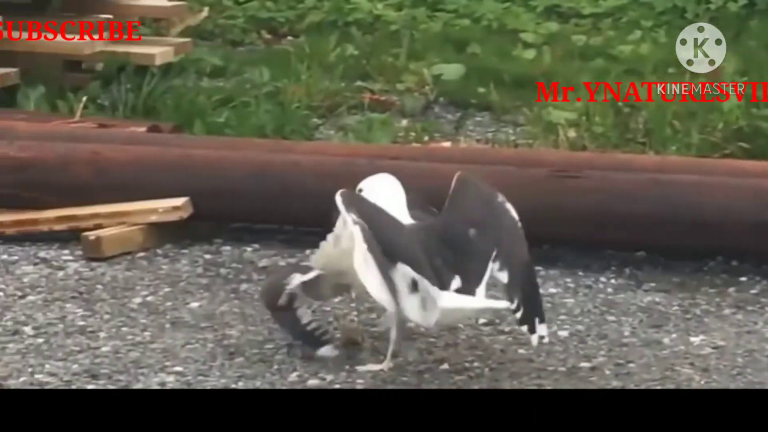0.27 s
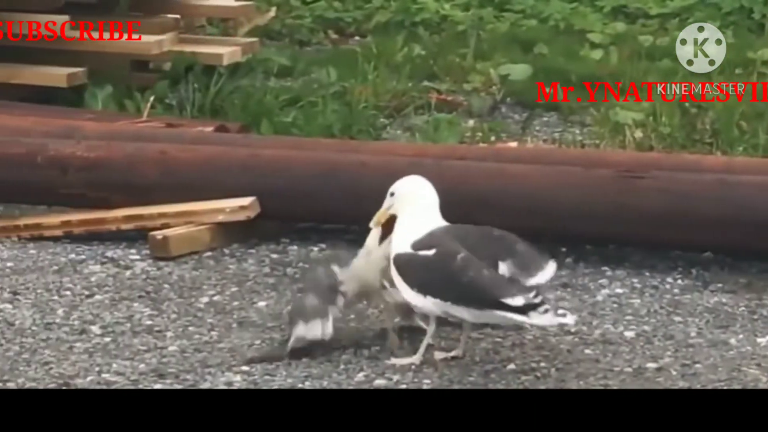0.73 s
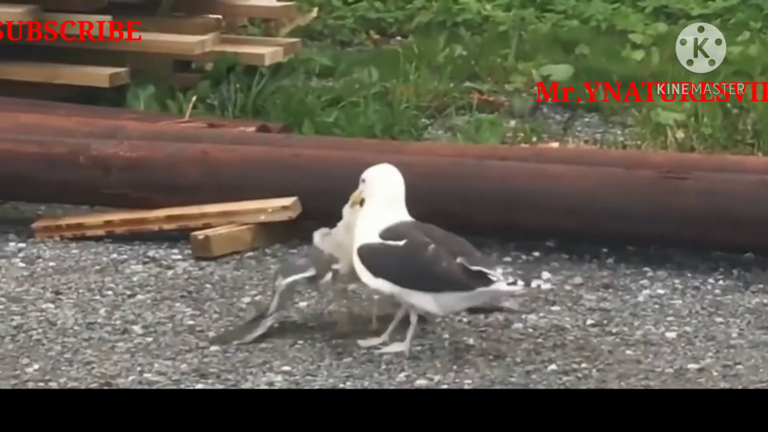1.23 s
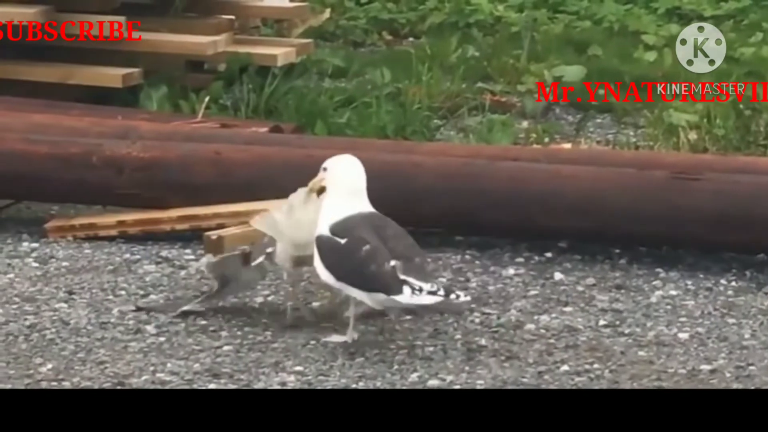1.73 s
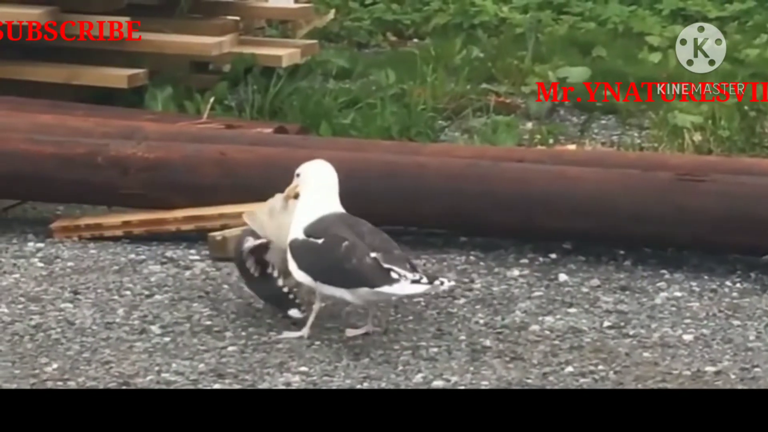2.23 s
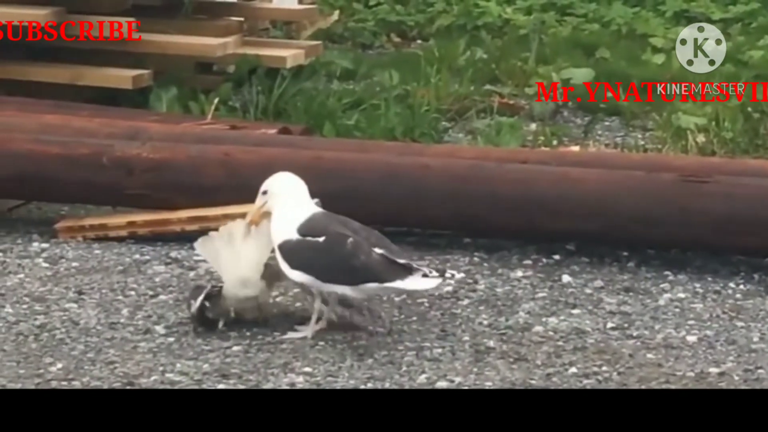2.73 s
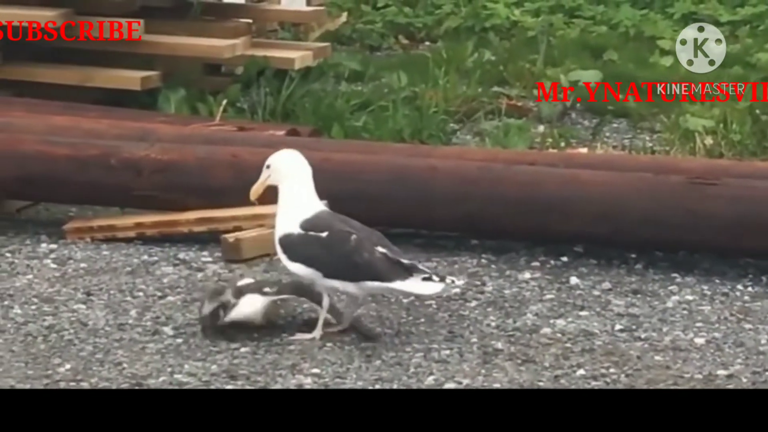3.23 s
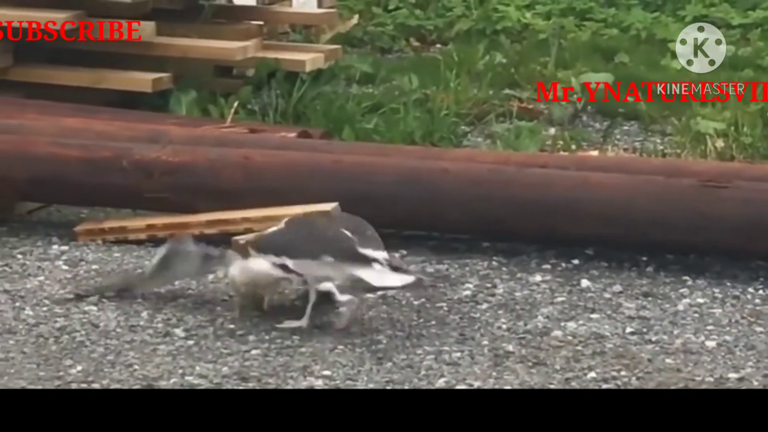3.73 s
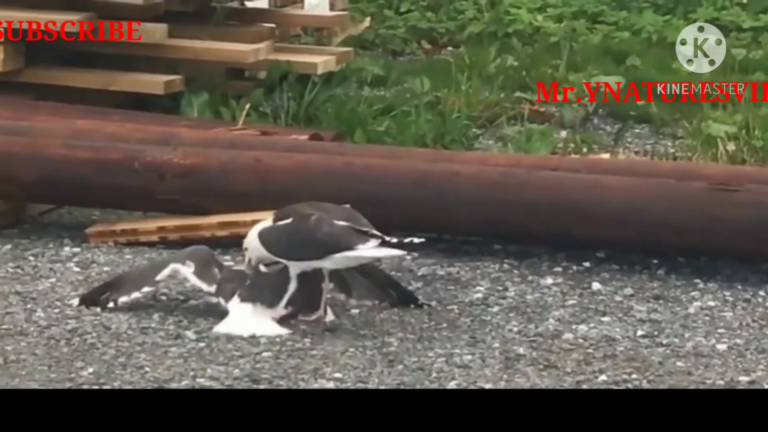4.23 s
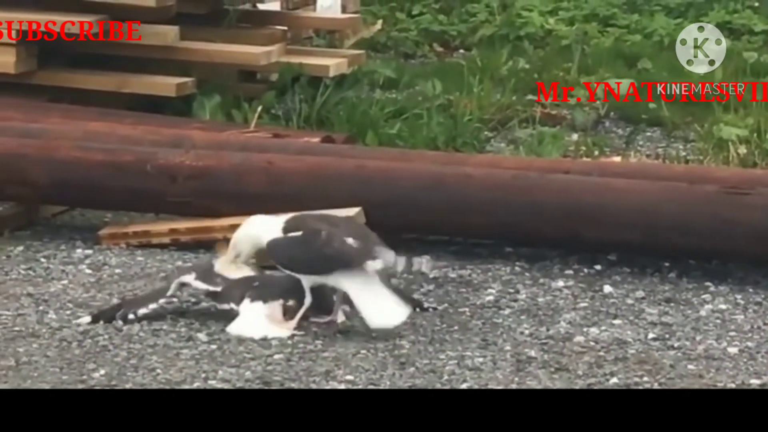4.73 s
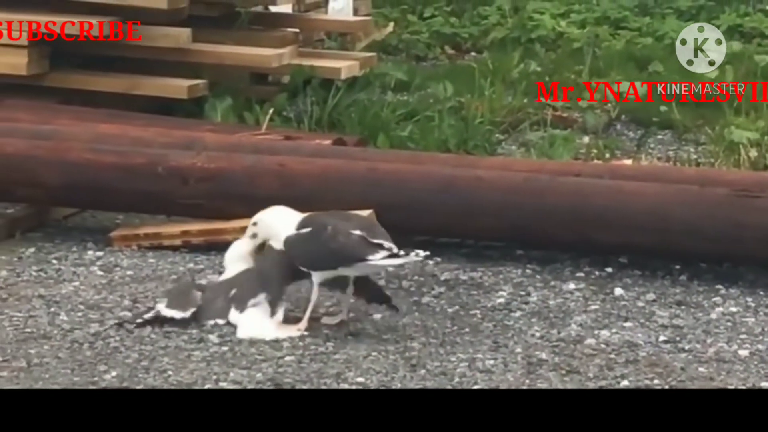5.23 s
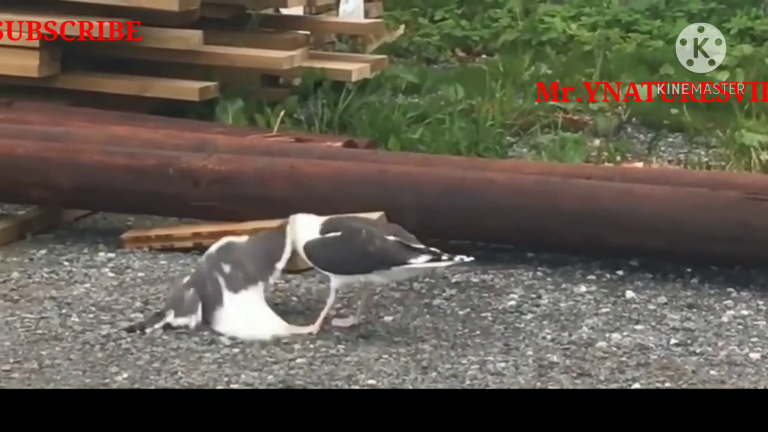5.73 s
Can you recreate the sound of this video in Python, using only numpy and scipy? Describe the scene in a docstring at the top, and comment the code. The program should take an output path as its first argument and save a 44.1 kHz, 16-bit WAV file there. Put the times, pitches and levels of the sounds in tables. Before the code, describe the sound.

Two fighting gulls: harsh, wavering cries with wing thumps, bill snaps and gravel clicks over a low drone of distant machinery.

```python
"""In an industrial yard, two large gulls fight on gravel; the one held down gives harsh, wavering cries.
Each cry is a train of pulses from the bird's voice box (the syrinx) that makes its throat ring,
and it breaks into a rasp under strain. Bills snap, stones click, feathers rustle and wings thump,
with a faint echo, over the low drone of distant machinery."""
import sys
import numpy as np
from scipy import signal
from scipy.fft import rfft, irfft, next_fast_len
from scipy.io import wavfile
from scipy.ndimage import uniform_filter1d, map_coordinates

SR = 44100
rng = np.random.default_rng(int(sys.argv[2]) if len(sys.argv) > 2 else 0)


def materialize(psi):
    """Save the field psi as 16-bit PCM at rate SR to the path in sys.argv[1].

    A 1-D psi becomes a single channel; in a 2-D psi each row is a channel.
    """
    bounded = np.clip(np.atleast_2d(psi).T, -1, 1)
    quanta = np.round(bounded * 32767).astype(np.int16)
    wavfile.write(sys.argv[1], SR, quanta)


N = 263718

# Feathers sweeping the ground. Each row: middle in seconds, half length in seconds, level in dB,
# extra dB for the part below 4 kHz.
FEATHER_STROKES = [(0.113, 0.047, -67.5, 8.5), (0.5, 0.098, -68.5, -8), (0.682, 0.042, -67.5, 8.5),
                   (0.821, 0.049, -66.5, 6.5), (0.924, 0.052, -64.5, 1), (1.397, 0.079, -61.5, 2),
                   (1.703, 0.17, -68, 3.5), (1.97, 0.092, -66, 6), (2.731, 0.094, -70.5, 6),
                   (2.937, 0.05, -77, -6), (3.686, 0.08, -77.5, -2), (3.977, 0.21, -72, 2.5),
                   (5.31, 0.025, -78, 6.5), (5.518, 0.061, -68.5, -13), (5.902, 0.1, -77, 2)]


def amp(db):
    """Turn decibels into a gain."""
    return 10 ** (np.asarray(db) / 20)


def unit(x):
    """Scale to an average (rms) size of 1."""
    return x / np.sqrt(np.mean(x ** 2) + 1e-20)


def peaked(x):
    """Scale to a peak of 1."""
    return x / np.abs(x).max()


def along(points, hz):
    """Read between (Hz, value) points, with octaves evenly spaced."""
    point_hz, values = np.transpose(points)
    return np.interp(np.log(hz + 1), np.log(point_hz + 1), values)


def curves(rows, t):
    """Read each column after the first (seconds) at times t."""
    seconds, *columns = np.transpose(rows)
    return [np.interp(t, seconds, column) for column in columns]


def wobble(rate):
    """A smooth curve through `rate` random values a second."""
    return map_coordinates(rng.standard_normal(int(N * rate / SR) + 4), [np.arange(N) * rate / SR])


def causal(db):
    """Turn gains in dB into a filter that rings only after it is struck (minimum phase)."""
    cepstrum = irfft(np.log(amp(db)))
    half = cepstrum.shape[-1] // 2
    return np.exp(rfft(cepstrum * np.r_[1, np.full(half - 1, 2), 1, np.zeros(half - 1)]))


def coloured(x, points):
    """Filter x to a tone colour given as (Hz, dB) points."""
    size = 2 * next_fast_len(len(x) // 2 + 2048)
    response = causal(along(points, np.fft.rfftfreq(size, 1 / SR)))
    return irfft(rfft(x, size) * response)[:len(x)]


def add(track, start_s, sound):
    """Mix a sound into the track."""
    part = track[round(start_s * SR):][:len(sound)]
    part += sound[:len(part)]


def hump(hz, centre_hz, width):
    """A bell-shaped curve around one frequency."""
    return np.exp(-.5 * (np.log((hz + 1) / centre_hz) / width) ** 2)


def bumps(rows):
    """Smooth swells. Each row: middle in seconds, half length in seconds, height."""
    out = np.zeros(N)
    for middle, half, height in rows:
        start = max(middle - 3 * half, 0)
        t = np.arange(start, middle + 3 * half, 1 / SR)
        add(out, start, height * np.exp(-((t - middle) / half) ** 2))
    return out


def pulses(at, sizes):
    """Clean, sharp pulses that may fall between samples."""
    taps = np.floor(at)[:, None] + np.arange(-7, 9)
    offset = taps - at[:, None]
    shapes = sizes[:, None] * np.sinc(offset) * np.cos(np.pi * offset / 16) ** 2
    return np.bincount(np.clip(taps, 0, N - 1).astype(int).ravel(), shapes.ravel(), N)


def machinery(rumble_db=-63.5, hum_gain_db=-2, waver_db=5):
    """Distant machines rumble and hum unsteadily under a faint outdoor hiss."""
    # Each row: frequency in Hz, relative level in dB.
    hum_tones = [(49.6, -67.5), (97, -72.5), (124, -71.5)]
    rumble_colour = [(12, -44.5), (20, -26), (38, -3), (70, -3), (133, -3.5), (196, -8.5), (213, -15),
                     (274, -16.5), (404, -20.5), (452, -23), (906, -24.5), (985, -22.5), (1500, -30),
                     (1770, -31), (15500, -43.5)]
    t = np.arange(N) / SR
    hum = np.zeros(N)
    for hz, db in hum_tones:
        level = amp(db + hum_gain_db + waver_db * wobble(12))
        hum += level * np.sqrt(2) * np.sin(2 * np.pi * hz * t + wobble(7))
    return hum + amp(rumble_db) * unit(coloured(rng.standard_normal(N), rumble_colour))


def syrinx(pitch, rough, sounding, jitter=0.12, tremor=0.00061, shimmer_db=3, doubling=0.13):
    """The voice box pulses once a cycle; strain scatters the pulses and lets rushing air through."""
    cycles = np.cumsum(sounding * pitch) / SR
    at = np.interp(np.arange(int(cycles[-1]) + 1) + 1e-3, cycles, np.arange(N))
    period, strain = SR / pitch[at.astype(int)], rough[at.astype(int)]
    late, size = rng.standard_normal((len(at), 2)).T
    slip = (tremor + jitter * strain ** 1.5) * period * late
    # Strain also weakens every second pulse.
    alternation = 1 + doubling * strain * np.cos(np.pi * np.arange(len(at)))
    sizes = amp(shimmer_db * strain * size) * alternation
    train = pulses(at + slip, np.sqrt(period) * sizes)
    # Air escapes in a burst as the membranes part, and its share grows toward the treble.
    burst = sounding * (1 + 1.1 * np.cos(2 * np.pi * (cycles - .15)))
    air = coloured(rng.standard_normal(N), [(1200, 0), (3500, 10), (7000, 16)])
    return train * (1 - rough ** 2) + burst * air * rough / (1 + rough ** 2)


def thrash(hz, frames, bands=9, span=7):
    """A thrashing head shifts small peaks and dips through the overtones (dB by frequency and time)."""
    ripples = uniform_filter1d(rng.standard_normal((len(hz), frames)), bands, axis=0)
    for _ in range(2):
        ripples = uniform_filter1d(ripples, span, axis=1)
    depth_db = along([(1100, .5), (2200, 2.2), (4500, 3.5)], hz)
    return unit(ripples) * depth_db[:, None]


def cry(voice, colour, throat_hz, throat_hz_per_db, half_width_hz, edge_db, gape_db, sizzle_db, tuning,
        gape_db_per_octave=12, drive_db=9, leak=0.23, waver=0.0048, chaos=.08):
    """Voice-box pulses ring the windpipe, the moving throat and three resonances of the opening bill."""
    # The voice breaks into a rasp. Each row: middle and half length in seconds, added roughness (0-1).
    breaks = [(0.155, 0.018, 0.53), (0.25, 0.049, 0.78), (0.375, 0.062, 0.39), (1.23, 0.015, 0.08),
              (1.37, 0.032, 0.15), (1.847, 0.019, 0.5), (2.506, 0.064, 0.14), (2.97, 0.034, 0.07),
              (4.195, 0.019, 0.06), (4.474, 0.023, 0.6)]
    # The voice catches. Each row: time in seconds, upward jump as a share of the pitch.
    catches = [(2.921, 0.17), (2.987, 0.17), (3.135, 0.1304), (3.29, 0.32)]
    # The windpipe's 600 Hz ring changes as the neck is wrung. Each row: time in seconds, boost in dB.
    windpipe_boosts = [(0.04, -0.5), (0.24, 17.5), (0.45, -11), (0.56, -1.5), (1.205, -20), (1.238, 13.5),
                       (1.268, -23), (1.39, 8.5), (1.465, 11), (1.51, -6), (1.68, -7), (1.97, 3.5),
                       (2.83, 4), (2.9, -10), (3.2, -5), (4.1, 3.5)]
    pitch, level, brightness, rough = voice
    rough = np.clip(rough + bumps(breaks), .01, .95)
    catch = bumps([(s, .0025, jump) for s, jump in catches])
    # Under strain the membranes lose their steady pitch.
    unsteady = pitch * (1 + catch + waver * wobble(70) + chaos * rough ** 2 * wobble(160))
    sounding = level > 1e-5
    first, last = np.flatnonzero(sounding)[[0, -1]]
    source = amp(drive_db) * level * syrinx(unsteady, rough, sounding)
    # The airway keeps changing shape, so each short slice of sound gets its own filter.
    hz, slice_s, slices = signal.stft(source[first:last + 1024], SR, nperseg=1024, noverlap=768)
    now = np.minimum(first + (slice_s * SR).astype(int), last)[:, None]
    effort_db = np.clip(20 * np.log10(level[now] / level[sounding].mean() + 1e-9), -8, 8)
    # Effort shifts the throat's ring, and the bird tunes it part of the way to the nearest overtone.
    rest_hz = throat_hz + throat_hz_per_db * effort_db
    centre_hz = rest_hz - tuning * pitch[now] / np.pi * np.sin(2 * np.pi * rest_hz / pitch[now])
    # Membranes that no longer close damp the throat and widen its resonance.
    width_hz = half_width_hz * (1 + leak * rough[now])
    throat = -10 * np.log10(1 + ((hz - centre_hz) / width_hz) ** 2) * hump(hz, 1173, 0.89)
    # The bill opens as a whole: its low boost (gape) and high one (sizzle) follow the middle one (edge).
    edge = brightness[now] + edge_db
    gape = gape_db + 0.18 * edge + gape_db_per_octave * np.log2(pitch[now] / pitch[sounding].mean())
    sizzle = sizzle_db + 0.78 * edge
    bill = gape * hump(hz, 2080, 0.15) + edge * hump(hz, 3410, 0.15) + sizzle * hump(hz, 7300, 0.63)
    windpipe = curves(windpipe_boosts, now / SR)[0] * hump(hz, 600, 0.12)
    filter_db = along(colour, hz) + windpipe + throat + bill + thrash(hz, len(slice_s)).T
    voiced = slices * causal(filter_db).T
    # The filter sets the colour; the loudness follows the effort alone.
    voiced *= np.linalg.norm(slices[hz < 2300], axis=0) / (np.linalg.norm(voiced, axis=0) + 1e-12)
    out = np.zeros(N)
    add(out, first / SR, signal.istft(voiced, SR, nperseg=1024, noverlap=768)[1])
    return out


def long_voice(rows, rough, onset_db, ending_db, scoop=1, scoop_s=0.025, sag_s=0.046, attack_s=0.0014,
               slack_hz=237.6, slack_dull_db=9.5, slack_rough=0.45, slack_span_hz=15.3):
    """A long cry scoops up from a slack, hoarse voice, holds, then sags back ever faster."""
    t = np.arange(N) / SR
    pitch, level_db, brightness = curves(rows, t)
    start, end = rows[0][0] - scoop_s, rows[-1][0] + sag_s
    opening = np.clip(1 - (t - start) / scoop_s, 0, 1)
    closing = np.clip(1 - (end - t) / sag_s, 0, 1) ** 1.39
    pitch = pitch + (slack_hz - pitch) * (scoop * opening + closing)
    swell = (t >= start) * (t <= end) * (1 - .5 * np.exp(-np.abs(t - start) / attack_s))
    hoarse = slack_rough * np.exp(-np.maximum(pitch - slack_hz, 0) / slack_span_hz)
    level = swell * amp(level_db + onset_db * opening + ending_db * closing)
    return pitch, level, brightness - slack_dull_db * (opening + closing), rough + hoarse


def cluck_voice(pitch_hz=236.8, brightness_db=-24, rough=0.31, attack_s=0.002, release_s=0.005):
    """Short clucks in a slack voice: each rises quickly, holds and fades."""
    # Each row: start in seconds, length in seconds, level in dB.
    clucks = [(3.782, 0.0064, -49), (3.801, 0.014, -41.5), (3.832, 0.021, -45.5), (3.888, 0.0092, -54),
              (4.921, 0.0041, -61)]
    t, steady = np.arange(N) / SR, np.ones(N)
    level = np.zeros(N)
    for start, length, db in clucks:
        rise = np.minimum(t - start, 0) / attack_s
        fall = np.maximum(t - start - length, 0) / release_s
        level += amp(db) * np.exp(rise - fall)
    return pitch_hz * steady, level, brightness_db * steady, rough * steady


def gull():
    """Open-billed cries, a moan and clucks with the bill half closed, and a squeal with the neck pinned."""
    # The held part of each cry. Each row: time in seconds, pitch in Hz, level in dB, brightness in dB.
    rasp_path = [(0.059, 297.2, -44, -10), (0.149, 287.9, -50, -18.5), (0.187, 336.2, -49.5, -11.5),
                 (0.237, 390.6, -50, -19.5), (0.301, 336.5, -48.5, -14.5), (0.317, 357.2, -47.5, -14.5),
                 (0.425, 354, -44, -15), (0.453, 340, -44.5, -14.5), (0.509, 351.9, -44.5, -11.5),
                 (0.545, 305, -45, -22.5), (0.635, 330.2, -40.5, -28), (0.646, 311, -42.5, -35)]
    wail_path = [(1.168, 284.5, -41, -16.5), (1.204, 271.4, -46, -15), (1.25, 347, -42.5, -18),
                 (1.288, 375.6, -38.5, -18), (1.352, 340.5, -44, -16.5), (1.39, 314.1, -44, -19.5),
                 (1.44, 354, -43, -13.5), (1.488, 312.8, -48.5, -7.5), (1.566, 341.7, -43.5, -4.5),
                 (1.588, 337.9, -43.5, -5), (1.634, 315.5, -44, -18.5), (1.672, 362.5, -39, -19),
                 (1.696, 396.3, -35, -24), (1.744, 376, -38.5, -10), (1.796, 361, -41, -19),
                 (1.812, 328, -41, -19)]
    yelp_path = [(1.905, 240.2, -47, -24.5), (1.95, 293.5, -44, -12), (1.985, 289.2, -40.5, -16)]
    moan_path = [(2.506, 304.3, -41, -16.5), (2.598, 268.9, -46, -22), (2.618, 255.1, -48, -27),
                 (2.702, 266.4, -43, -30), (2.738, 292.4, -48.5, -27), (2.776, 262.5, -43, -30),
                 (2.842, 275.6, -48.5, -18.5), (2.886, 287.1, -44, -27.5), (2.924, 283.8, -43.5, -25),
                 (3.1, 291.2, -43, -21), (3.254, 284, -41.5, -25.5)]
    squeal_path = [(4.125, 559, -47.5, -38), (4.198, 585, -44, -39), (4.21, 415.6, -49, -27),
                   (4.285, 437.7, -45, -27), (4.312, 425.5, -44.5, -25.5), (4.325, 404.3, -50, -21.5),
                   (4.402, 400.8, -50.5, -22), (4.422, 435.8, -44, -24), (4.45, 372.7, -44.5, -33.5)]
    # Tone colours of the cries as heard close to the ground, with dips from its reflection.
    # Each row: frequency in Hz, gain in dB.
    open_colour = [(150, -49.5), (300, -11.5), (470, -9), (620, 3.5), (1000, 2), (1400, -3), (1720, 5),
                   (1960, 3.5), (2250, -18), (2600, -20), (3450, -4), (4200, -14.5), (4800, -28.5),
                   (6800, -31.5), (9000, -51), (14000, -60.5)]
    moan_colour = [(150, -42), (300, -10), (560, 2), (850, 3.5), (1200, 4.5), (1450, 0.5), (1800, 4),
                   (2350, -6), (2600, -28.5), (2900, -6.5), (3400, -15.5), (3780, -14), (4900, -36),
                   (6800, -29), (8500, -50.5), (14000, -56)]
    squeal_colour = [(150, -58), (300, -30), (560, -16.5), (850, -19), (1300, -20), (1900, -30),
                     (2450, -18.5), (2850, -59), (3500, -30.5), (3950, -52), (4500, -45.5), (5300, -59),
                     (6500, -52), (9000, -70.5), (14000, -91)]
    rasp = cry(long_voice(rasp_path, rough=0.148, onset_db=-5, ending_db=-1), open_colour,
               throat_hz=1064, throat_hz_per_db=-7, half_width_hz=106, tuning=0.2,
               edge_db=17.5, gape_db=-2.5, sizzle_db=-9.5)
    wail = cry(long_voice(wail_path, rough=0.087, onset_db=-3.5, ending_db=-3), open_colour,
               throat_hz=1137, throat_hz_per_db=28.5, half_width_hz=67, tuning=0.22,
               edge_db=17.5, gape_db=1.5, gape_db_per_octave=32, sizzle_db=-6)
    yelp = cry(long_voice(yelp_path, rough=0.082, onset_db=-5, ending_db=-11), open_colour,
               throat_hz=1137, throat_hz_per_db=-5, half_width_hz=53, tuning=0.27,
               edge_db=19.5, gape_db=0.5, gape_db_per_octave=-27, sizzle_db=-4.5)
    moan = cry(long_voice(moan_path, rough=0.036, onset_db=-2.5, ending_db=-4), moan_colour,
               throat_hz=1090, throat_hz_per_db=29, half_width_hz=98, tuning=0.28,
               edge_db=23.5, gape_db=-1.5, gape_db_per_octave=16, sizzle_db=-3.5)
    clucks = cry(cluck_voice(), moan_colour,
                 throat_hz=1180, throat_hz_per_db=3, half_width_hz=46, tuning=0.3,
                 edge_db=18, gape_db=6.5, sizzle_db=-7)
    squeal = cry(long_voice(squeal_path, rough=0.14, onset_db=-10, ending_db=-12.5, scoop=0),
                 squeal_colour, throat_hz=1128, throat_hz_per_db=44, half_width_hz=77, tuning=0.17,
                 edge_db=27.5, gape_db=-3.5, gape_db_per_octave=-13, sizzle_db=-3)
    return rasp + wail + yelp + moan + clucks + squeal


def pebbles(count=32, over_stroke_db=10, scatter_db=3, spread=0.98, knock_db=-7, treble_db=2):
    """Small stones flicked at random during the feather strokes, as rows for clicks()."""
    middle, half, stroke_db, _ = np.transpose(FEATHER_STROKES)[:, np.arange(count) % len(FEATHER_STROKES)]
    when, size = rng.uniform(-1, 1, (count, 2)).T
    times = np.clip(middle + spread * half * when, 0, N / SR)
    levels = stroke_db + over_stroke_db + scatter_db * size
    return [(start, db, knock_db, treble_db) for start, db in zip(times, levels)]


def clicks(fade_s=0.026, gain_db=1):
    """Bills snap and stones are kicked: a crack, brighter for sharper edges, over a duller knock."""
    # Each row: start in seconds, level in dB, knock against crack in dB, treble boost in dB.
    contacts = [(0.0725, -47.5, -1.5, 0), (0.1505, -56, -4, 8), (0.4976, -57, -23, 23.5),
                (0.6305, -50, 3.5, 0), (0.6597, -51, 7, -12), (0.6833, -39.5, -1, 1), (0.823, -49.5, 1, 5),
                (0.8971, -53, 4.5, -2), (1.353, -47, 11, -13), (1.361, -37, 1.5, -8), (1.3847, -41, -8, -5),
                (1.8915, -47, -5, -8), (1.9174, -41, -17, -2), (2.0305, -47, -35, 12),
                (2.1939, -48, -12, 4.5), (2.7548, -53, -1.5, -2), (2.8937, -51.5, -2, -14),
                (2.9423, -57, -12, 5), (3.919, -48, -2, -3), (3.9301, -32, -7, -13.5),
                (4.036, -52, -5, -15)]
    # Each row: frequency in Hz, gain in dB.
    crack_colour = [(300, -74), (1500, -32), (2600, -51), (3800, -3), (5000, -8.5), (6500, -5), (9000, -11),
                    (10400, -17), (13000, -11), (16000, -5)]
    knock_colour = [(100, -13.5), (400, 14.5), (1000, 6.5), (1900, 14), (2700, 0.5), (3700, 7), (5000, -15),
                    (12000, -39)]
    out, t = np.zeros(N), np.arange(SR // 20) / SR
    for start, db, knock_db, treble_db in contacts + pebbles():
        crack, knock = rng.standard_normal((2, len(t))) * amp(-60 * t / fade_s)
        crack = peaked(coloured(crack, crack_colour))
        crack = coloured(crack, [(6000, 0), (13000, treble_db)])
        knock = amp(knock_db) * peaked(coloured(knock, knock_colour))
        add(out, start, amp(db + gain_db) * (crack + knock))
    return out


def rustle(grit=0.96, grains_per_s=230, flutter_db=1):
    """Each stroke brushes feathers over the ground and shifts a few grains of grit."""
    # Each row: frequency in Hz, gain in dB.
    feather_colour = [(150, -31), (250, -2), (330, -17), (603, -7.5), (809, -10), (1890, -11.5),
                      (2360, -11.5), (2760, -42.5), (3280, -11), (4550, -18.5), (9070, -17), (10200, -26.5),
                      (13300, -22.5), (15500, -54)]
    grains = (rng.random(N) < grains_per_s / SR) * rng.standard_normal(N)
    brush = rng.standard_normal(N) * amp(-flutter_db * wobble(62))
    scrape = unit(coloured(brush + grit * unit(grains), feather_colour))
    # Each stroke has a high hiss and a lower rustle, balanced stroke by stroke.
    low = signal.sosfiltfilt(signal.butter(2, 4000, fs=SR, output="sos"), scrape)
    hiss_level = bumps([(s, half, amp(db)) for s, half, db, _ in FEATHER_STROKES])
    low_level = bumps([(s, half, amp(db + low_db)) for s, half, db, low_db in FEATHER_STROKES])
    return hiss_level * (scrape - low) + low_level * low


def wings(swings=9, swell_s=0.0017, slap_fade_s=0.17):
    """A wing blow shoves the air in a few low swings and slaps the other bird."""
    # Each row: start in seconds, level in dB, pitch of the push in Hz, slap against push in dB.
    blows = [(0.658, -43.5, 141, -0.5), (0.682, -43.5, 126, -11), (1.353, -40.5, 178, -5),
             (1.812, -41, 72.7, -16), (1.977, -43.5, 51, -27), (2.018, -52, 78.4, -8),
             (2.239, -52, 63.5, -12), (3.823, -48.5, 54.4, -23), (5.659, -47.5, 40, -28),
             (5.733, -41, 56, -14), (5.852, -54, 147, 0.5)]
    # Each row: frequency in Hz, gain in dB.
    push_colour = [(20, -9), (50, -7.5), (80, -2.5), (130, -5), (300, -4.5), (700, -30), (2000, -73)]
    slap_colour = [(100, -14), (300, 13), (800, -1), (2000, -7.5), (2700, -23), (3700, -13.5), (9000, -35)]
    out, t = np.zeros(N), np.arange(SR // 4) / SR
    for start, db, push_hz, slap_db in blows:
        swell = amp(-60 * t * push_hz / swings) * (1 - np.exp(-t / swell_s))
        push = peaked(coloured(swell * np.sin(2 * np.pi * push_hz * t), push_colour))
        burst = rng.standard_normal(len(t)) * amp(-60 * t / slap_fade_s)
        slap = amp(slap_db) * peaked(coloured(burst, slap_colour))
        add(out, start, amp(db) * (push + slap))
    return out


def echo(x):
    """Pipes and timber stacks scatter a thin tail; the highest treble dies first."""
    # Each row: frequency in Hz, seconds to fade by 60 dB.
    fade_times = [(200, 0.11), (1200, 0.81), (4000, 0.92), (12000, 0.03)]
    hz, t, noise = signal.stft(rng.standard_normal(SR), SR, nperseg=256)
    fade = amp(-60 * t / along(fade_times, hz)[:, None])
    tail = signal.istft(noise * fade, SR, nperseg=256)[1]
    return signal.fftconvolve(x, tail / np.linalg.norm(tail))[:N]


def scene(echo_db=-25):
    """The fight, its echo and the machinery, in one channel."""
    fight = gull() + clicks() + wings() + rustle()
    return (fight + amp(echo_db) * echo(fight) + machinery())[None]


def record(dry):
    """Cut away the very highest treble."""
    top_hz = 15650
    size = next_fast_len(N + SR // 4)
    kept = np.fft.rfftfreq(size, 1 / SR) < top_hz
    return irfft(rfft(dry, size) * kept, size)[:, :N]


dry = scene()
out = record(dry)
materialize(out)
```